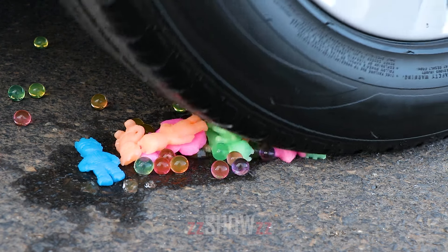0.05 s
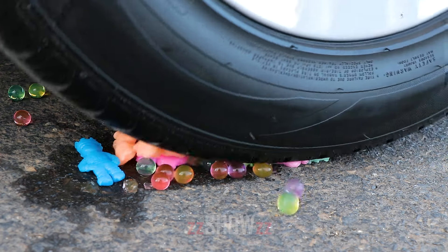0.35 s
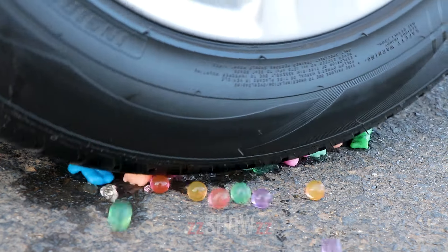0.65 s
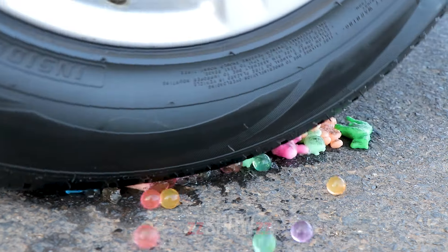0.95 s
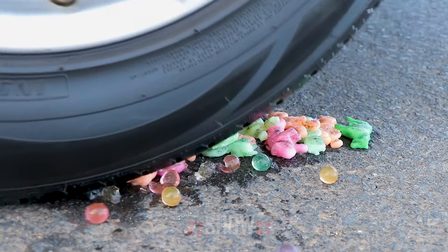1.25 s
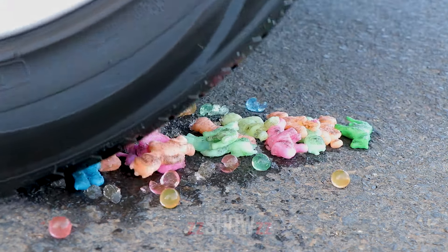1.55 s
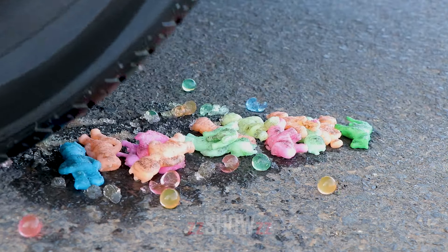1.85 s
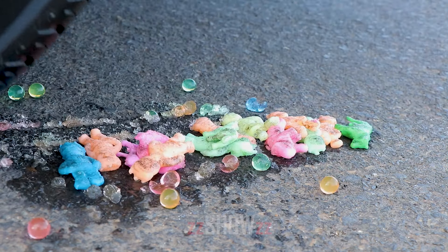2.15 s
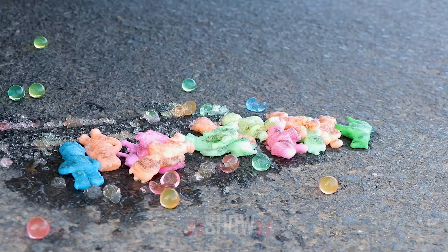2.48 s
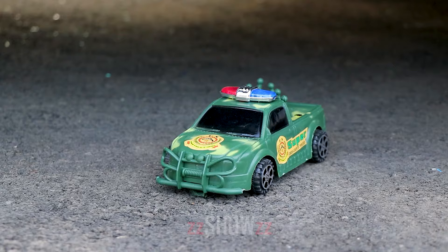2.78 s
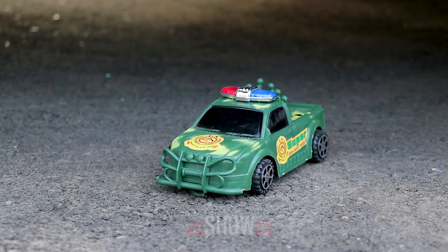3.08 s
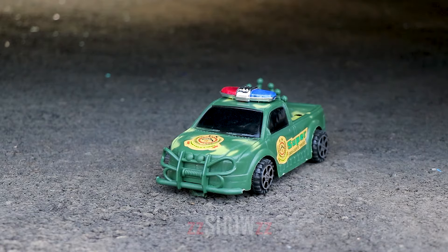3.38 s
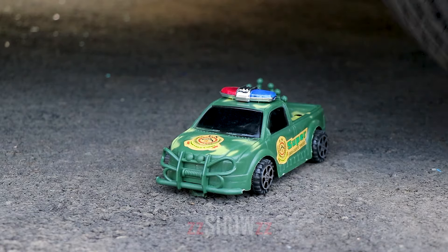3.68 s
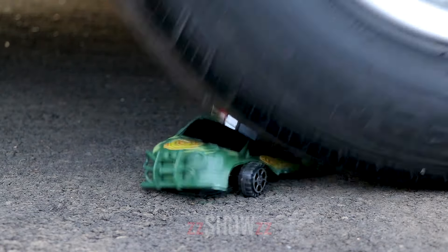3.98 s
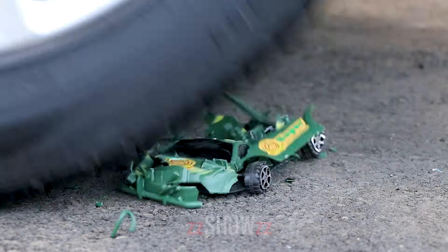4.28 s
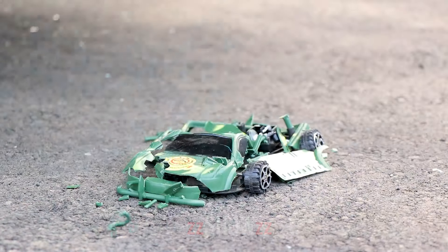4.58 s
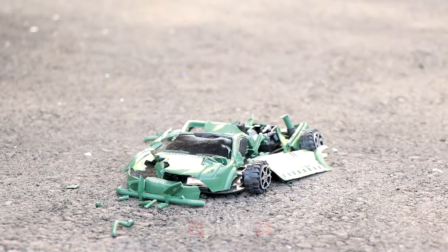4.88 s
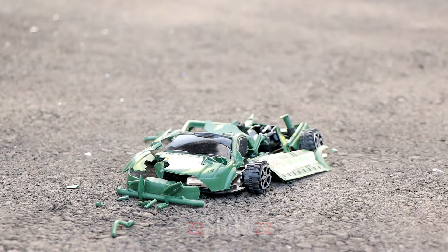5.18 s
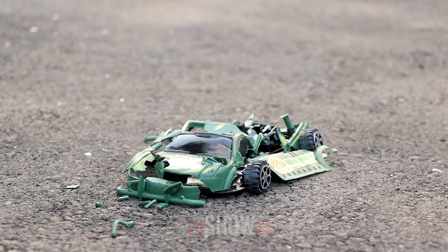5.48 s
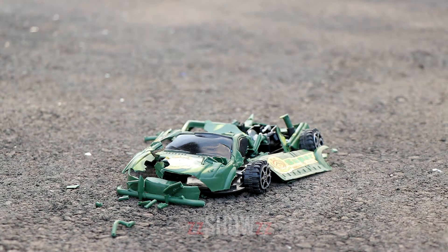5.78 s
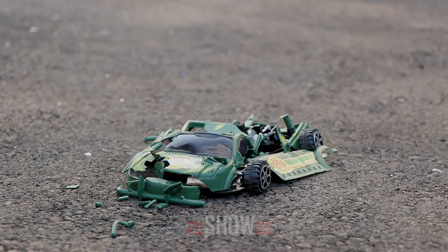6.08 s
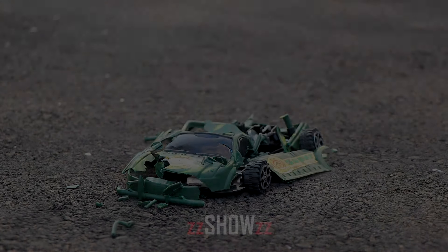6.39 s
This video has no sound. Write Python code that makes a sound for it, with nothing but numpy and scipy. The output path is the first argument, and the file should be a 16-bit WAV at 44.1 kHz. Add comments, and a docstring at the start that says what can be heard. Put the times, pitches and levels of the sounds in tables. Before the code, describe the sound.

Close to the asphalt outdoors, a car creeps along with its engine idling while the tyre squeezes wet gel beads, which squelch, squeak and pop. A faint cricket chirps and a few stones tick. The engine then revs and the tyre rolls over a hollow plastic toy truck with a short, very loud crunch. Splinters land, the engine settles, and a thin, high brake squeal sounds near the end.

```python
"""A car creeps over soft toys and water beads on asphalt, close by, its engine idling and its tread hissing.
First the wet beads squeak, plop and spray as they burst. Then a cricket chirps and a few stones tick.
Near 4 s the engine revs and the tyre rolls over a hollow plastic toy truck, whose shell gives way
in a run of cracks that overloads the microphone. The engine settles again, and near 6 s
a brake pad rubs its disc into a thin squeal as the car stops."""
import sys
import numpy as np
from scipy import signal
from scipy.fft import rfft, irfft
from scipy.io import wavfile

SR = 44100
rng = np.random.default_rng(int(sys.argv[2]) if len(sys.argv) > 2 else 0)


def store_pcm(level_fs):
    """Save levels as 16-bit WAV."""
    pcm = np.round(np.clip(level_fs, -1, 1) * 32767).astype(np.int16)
    wavfile.write(sys.argv[1], SR, np.atleast_2d(pcm).T)


N = 284004
TIME = np.arange(N) / SR

# the main cracks of the toy's shell: (time [s], length [s], snap level [dB], panel level before boost [dB])
CRACKS = [(4.026, 0.0039, -21, -12), (4.0314, 0.0043, -10.5, -4), (4.0408, 0.008, -5.5, 2),
          (4.052, 0.0068, -7, -1), (4.0634, 0.0068, -5.5, -12), (4.079, 0.0051, -3.5, -6),
          (4.0864, 0.0081, -5.5, -7.5), (4.1014, 0.0088, -6.5, -5.5), (4.1214, 0.0034, -3, -11.5),
          (4.1303, 0.009, -10.5, -15), (4.145, 0.0028, -8, -8), (4.155, 0.004, -10, -4),
          (4.165, 0.0021, -7.5, -13), (4.1727, 0.006, -8.5, -15), (4.186, 0.005, -9, -7),
          (4.1935, 0.0013, -2.5, -13), (4.2145, 0.0012, -6, -11), (4.218, 0.005, -3, -8.5),
          (4.226, 0.004, -14, -10.5), (4.2426, 0.0021, -1.5, 6.5), (4.261, 0.0014, -10, -5.5),
          (4.2884, 0.0013, -5, 0.5)]
# tone of a snap: (frequency [Hz], level [dB])
SNAP_TONE = [(100, -16.5), (200, -5), (300, -7.5), (600, 0), (1000, -1), (1350, -3), (2200, -3),
             (3200, -3.5), (5000, -7), (7000, -11), (11000, -19), (16000, -25)]
# notes the hollow shell rings at: (pitch [Hz], level [dB], time to fade by 60 dB [s])
SHELL_NOTES = [(266.4, -28.5, 0.12), (323, -29.5, 0.053), (429.4, -29, .09), (622, -29, .1),
               (760, -30.5, .1), (884, -27, 0.089), (1115, -35, 0.042), (1671, -29, .035),
               (2340, -31, 0.06), (2360, -27.5, 0.024), (2707, -29.5, 0.015), (4250, -28, 0.014),
               (5160, -31, 0.033)]
# pitch of the panel that gives way, mostly falling as the toy is flattened: (time [s], pitch [Hz])
PANEL_PITCH = [(4.04, 1060), (4.085, 915), (4.155, 494), (4.245, 456.4), (4.285, 644)]
# the louder beads bursting: (time [s], length [s], squeak level [dB], squeak pitch [Hz],
# plop level [dB], spray level before trim [dB])
BEAD_POPS = [(0.075, 0.0026, -43, 4350, -65, -66), (0.118, 0.016, -34.5, 2800, -51, -42.5),
             (0.14, 0.005, -34.5, 4900, -45, -37.5), (0.1577, 0.0015, -25.5, 4650, -51, -33),
             (0.258, 0.011, -39.5, 1800, -49, -48.5), (0.3568, 0.016, -29.5, 2370, -39.5, -41),
             (0.433, 0.019, -43.5, 1780, -44, -72), (0.4858, 0.008, -24.5, 3400, -59, -42),
             (0.499, 0.015, -35.5, 3380, -61, -54), (0.5346, 0.0057, -20, 2830, -53, -35.5),
             (0.5542, 0.0013, -27, 4400, -52, -26), (0.5615, 0.0018, -30, 4500, -47, -31),
             (0.5658, 0.0081, -24, 2930, -58, -37), (0.625, 0.0013, -31, 4460, -57, -47),
             (0.649, 0.00084, -30.5, 2340, -39, -39.5), (0.663, 0.007, -40.5, 3420, -46, -47),
             (0.753, 0.0036, -39, 2360, -56, -38), (0.856, 0.0013, -38, 2970, -59, -65),
             (0.912, 0.0091, -36.5, 3000, -44.5, -65), (0.929, 0.0055, -23, 2950, -44, -64),
             (0.973, 0.00092, -33.5, 3150, -57, -30), (1.01, 0.016, -40, 3600, -47, -48.5),
             (1.029, 0.019, -31, 2580, -35, -62), (1.18, 0.013, -39.5, 3550, -46, -64),
             (1.199, 0.0031, -25.5, 3870, -37, -32), (1.2758, 0.0072, -26.5, 2238, -31.5, -43.5),
             (1.3426, 0.0015, -28, 2440, -48, -62.5), (1.3638, 0.005, -25, 3320, -34.5, -37)]
# how loudly the wet gel is squeezed under the tread: (time [s], level [dB])
SQUELCH_LEVEL = [(0, -57), (.33, -50), (.62, -44.5), (.86, -52), (1.05, -49), (1.38, -52), (1.46, -71),
                 (2.1, -67), (3.1, -100)]
# strength of the gel's bubbles by pitch: (pitch [Hz], level [dB])
SQUELCH_TONE = [(1000, -3.5), (2200, -4.5), (3400, 6.5), (5000, 0), (7000, -6), (11000, -18), (16000, -34)]
# engine speed: (time [s], firing rate [Hz])
FIRING_RATE = [(0, 20), (1.05, 20.7), (1.65, 18.5), (3.54, 22.3), (3.77, 38), (3.95, 44), (4.25, 43),
               (4.85, 23.3), (5.85, 19.3)]
# the tones in the engine's hum: (multiple of the firing rate, level [dB])
HUM_TONES = [(1, -9), (2, -11), (3, -4.5), (4, -10.5), (5, -2.5), (6, -9.5), (7, -7), (8, -8), (9, -13.5),
             (10, -13.5), (12, -12)]
# tone of the engine's puffs: (frequency [Hz], level [dB])
ENGINE_TONE = [(30, -11), (60, -6), (110, -3), (200, -8), (310, 5.5), (430, 1.5), (720, 1), (1000, -0.5),
               (1500, -15), (2300, -16), (3200, -20.5), (5000, -22.5), (7000, -33.5), (11000, -42),
               (15000, -40)]
# notes the engine bay rings at: (pitch [Hz], level [dB], time to fade by 60 dB [s])
BAY_NOTES = [(314, -12, 0.041), (591, -15.5, 0.047), (751, -15, 0.091), (1060, -20, 0.11),
             (1780, -23, 0.096)]
# how loud the engine is; it drops suddenly at 2.7 s, swells on the run and fades out at the end:
# (time [s], level [dB])
ENGINE_LEVEL = [(0, 0), (1.7, 0.5), (2.66, -3.5), (2.74, -10.5), (3.4, -10), (3.9, -5), (5.1, -7),
                (6.44, -15.5)]
# hiss of grit under the creeping tread: (time [s], level [dB])
CREEP_HISS = [(0, -55.5), (1.38, -54.5), (1.5, -62), (2.65, -62), (3.45, -71), (6.44, -89)]
# tone of the tread's hiss: (frequency [Hz], level [dB])
HISS_TONE = [(400, -16), (1000, 3), (2200, 3), (3400, -4.5), (5000, -8.5), (7000, -15), (11000, -26),
             (16000, -28)]
# tone of the tyre's rumble: (frequency [Hz], level [dB])
RUMBLE_TONE = [(15, -35.5), (25, -14), (134, 1), (205, -3.5), (260, 2), (359, -9.5), (738, -0.5),
               (920, -11.5), (1270, -8.5), (3000, -23.5), (3900, -51), (6600, -120)]
# stones and splinters ticking on the asphalt: (time [s], level [dB], pitch [Hz])
TICKS = [(1.827, -53, 5000), (1.938, -52.5, 4500), (2.041, -47.5, 2490), (2.083, -47, 2330),
         (2.413, -59, 5000), (4.333, -37, 3620), (4.457, -39, 4680), (4.483, -55, 7400), (4.5, -53, 6000)]
# dull knocks and scuffs from the car: (time [s], length [s], level [dB], pitch [Hz])
KNOCKS = [(2.869, 0.022, -51, 486), (2.894, 0.03, -48.5, 247), (3.592, 0.026, -47, 1150),
          (5.505, 0.03, -52.5, 329.5), (6.311, 0.039, -64, 125.2)]
# the brake pad touches twice: (time of the peak [s], level [dB], swell time [s])
SQUEALS = [(5.985, -45.5, 0.077), (6.12, -73, 0.041)]
# cricket chirps: (time [s], peak level [dB])
CHIRPS = [(1.606, -62), (1.90, -61), (2.249, -56.5), (2.583, -58)]
# how long the yard echoes: (frequency [Hz], time to fade by 60 dB [s])
YARD_FADE = [(100, 0.6), (500, 0.52), (2000, 0.42), (5000, 1), (12000, .5)]
# tone of the yard's echo: (frequency [Hz], level [dB])
ECHO_TONE = [(100, 2), (220, 5.5), (400, 0.5), (650, 5.5), (1200, 2), (2500, -7), (5000, -12),
             (9000, -13.5), (16000, -21)]

CRUSH_START_S, CRUSH_END_S = 4.0, 4.29  # the tyre is on the toy truck


def toy_truck(shard_db=-12, shard_fade_s=.0036, panel_boost_db=2.5, panel_cycles=12, shell_db=-12):
    """Each crack is a run of tiny breaks: it rings the shell, pings a shard and lets a panel spring."""
    breaks, shards, panels = np.zeros((3, N))
    t = TIME[:SR // 10]
    for s, length, snap_db, panel_db in CRACKS + splinters():
        panel_hz = np.interp(s, *np.transpose(PANEL_PITCH)) * 2 ** (.08 * rng.uniform(-1, 1))
        run = clicks(length, per_s=9000, tail_s=.005, tail_db=-23)
        add(breaks, s, at_level(run, length, snap_db))
        shard_hz = 2000 * 3 ** rng.random()
        ping = ring(band(run, 890, 9000), shard_hz, shard_fade_s)
        add(shards, s, at_level(ping, length, snap_db + shard_db))
        # every panel rings for the same number of cycles, so the broad, low ones last longest
        swing = np.sin(2 * np.pi * panel_hz * t) * from_db(-60 * t * panel_hz / panel_cycles)
        add(panels, s, rng.choice([-1, 1]) * from_db(panel_db + panel_boost_db) * swing)
    shell = sum((-1) ** k * from_db(db) * ring(breaks, hz, fade_s)
                for k, (hz, db, fade_s) in enumerate(SHELL_NOTES))
    crunch = shape_tone(breaks, SNAP_TONE) + from_db(shell_db) * shell + shards + panels
    return band(crunch, 165, 20000)  # so small a body gives off little bass


def splinters(per_s=150, length_s=.002, snap_db=-20, panel_db=-18.5, range_db=16, spread_db=4):
    """Small cracks that grow louder with the weight on the toy; rows as in CRACKS."""
    after, size = scatter(CRUSH_END_S - CRUSH_START_S, per_s, columns=1)
    times = CRUSH_START_S + after
    levels = range_db * (weight(times) - 1) + spread_db * size
    return [(s, length_s, snap_db + db, panel_db + db) for s, db in zip(times, levels)]


def weight(s, roll_on_s=.05, roll_off_s=.12):
    """Share of the tyre's weight on the toy at time s: it comes on, stays and rolls off."""
    return np.clip(np.minimum((s - CRUSH_START_S) / roll_on_s, (CRUSH_END_S - s) / roll_off_s), 0, 1)


def beads(pitch_spread=1.174, skin_db=-12, spray_trim_db=-1.5):
    """Wet gel sticks and slips as it splits: a short squeak, a plop below it and a fine spray above."""
    out = np.zeros(N)
    spray_tone = [(2000, -31), (5000, 1), (8000, -3.5), (11000, -9.5), (16000, -16)]
    for s, length, squeak_db, hz, plop_db, spray_db in BEAD_POPS + small_pops():
        tear = clicks(length, per_s=4500, tail_s=.008, tail_db=-14)
        smooth = band(tear, 1900, 8800)  # soft gel rounds off every slip
        note = rms_one(band(smooth, hz / pitch_spread, hz * pitch_spread))
        squeak = note + from_db(skin_db) * rms_one(band(smooth, 2180, 3660))
        plop = band(band(tear, 810, 2700), 780, 2660)
        spray = shape_tone(clicks(length, per_s=3400, tail_s=.0068, tail_db=-10), spray_tone)
        for part, db in ((squeak, squeak_db), (plop, plop_db), (spray, spray_db + spray_trim_db)):
            add(out, s, at_level(part, length, db))
    return out


def small_pops(pile_s=1.2, per_s=28, length_s=.005, low_hz=1800, high_hz=5000, plop_db=-14, spray_db=-10):
    """Lesser beads burst at random, as strongly as the gel is squeezed; rows as in BEAD_POPS."""
    s, softness, pitch, stretch = scatter(pile_s, per_s, columns=3)
    db = np.interp(s, *np.transpose(SQUELCH_LEVEL)) + 3.5 - 1.5 * softness  # 2 to 5 dB over the squelch
    hz = low_hz * (high_hz / low_hz) ** ((pitch + 1) / 2)
    return list(zip(s, length_s * 2 ** stretch, db, hz, db + plop_db, db + spray_db))


def squelch(bubbles_per_s=1700, size_spread_db=1.5, clump_db=5.5, cycles=12, pitch_count=24):
    """Tiny wet bubbles snap in clumps, each ringing for a few cycles at one of many pitches."""
    sizes = from_db(size_spread_db * np.minimum(rng.exponential(1, N), 3)) * rng.choice([-1, 1], N)
    snaps = sizes * (rng.random(N) < bubbles_per_s / SR)
    snaps *= from_db(clump_db * np.tanh(drift(110)))
    pitch_choice = rng.integers(0, pitch_count, N)
    bubbles = sum(from_db(at_hz(SQUELCH_TONE, hz)) * ring(snaps * (pitch_choice == k), hz, cycles / hz)
                  for k, hz in enumerate(np.geomspace(1100, 15000, pitch_count)))
    return from_db(over_time(SQUELCH_LEVEL)) * rms_one(band(bubbles, 1100, 16000))


def engine(throb=.81, sharpness=5, rev_noise_db=5.5, rev_hum_db=23):
    """Every firing gives a puff of noise that rings the engine bay; low tones in step with it hum."""
    level_db, effort = over_time(ENGINE_LEVEL), revs()
    noise_db = -51.5 + level_db + rev_noise_db * effort
    hum_db = -63 + .55 * level_db + rev_hum_db * effort ** 2  # the hum follows ENGINE_LEVEL only partly
    firings = np.cumsum(over_time(FIRING_RATE)) / SR
    puffs = rms_one(1 + throb * np.exp(-sharpness * (firings % 1))) * rng.standard_normal(N)
    bay = sum(from_db(db) * rms_one(ring(puffs, hz, fade_s)) for hz, db, fade_s in BAY_NOTES)
    clatter = from_db(-3) * shape_tone(puffs, ENGINE_TONE) + bay
    hum = sum(from_db(db) * np.sqrt(2) * np.sin(2 * np.pi * (k * firings + rng.random()))
              for k, db in HUM_TONES)
    return from_db(noise_db) * clatter + from_db(hum_db) * hum


def revs(idle_hz=17, full_hz=46.6):
    """Engine speed, from near 0 at idle to near 1 at the height of the run."""
    return np.maximum(over_time(FIRING_RATE) - idle_hz, 0) / (full_hz - idle_hz)


def tyre(closest_s=4.11, pass_width_s=.15, pass_hiss_db=-43, grain_db=2,
         creep_rumble_db=-71, pass_rumble_db=-38.5, crush_rumble_db=-38):
    """The tread rumbles, and hisses unevenly on the grain of the asphalt."""
    # on the fast run, both grow with speed and fall with distance
    passing = revs() / np.hypot(1, (TIME - closest_s) / pass_width_s)
    hiss_gain = np.hypot(from_db(over_time(CREEP_HISS)), from_db(pass_hiss_db) * passing)
    run_gain = from_db(pass_rumble_db) * passing + from_db(crush_rumble_db) * weight(TIME)
    rumble_gain = np.hypot(from_db(creep_rumble_db), run_gain)
    grit = rng.standard_normal(N) * hiss_gain * from_db(grain_db * drift(460))
    return shape_tone(grit, HISS_TONE) + rumble_gain * shape_tone(rng.standard_normal(N), RUMBLE_TONE)


def ticks(length_s=.0029, ping_db=-3, ping_fade_s=.0089):
    """Stones snap out from under the tread and splinters land, each with a brief ping."""
    out = np.zeros(N)
    for s, db, hz in TICKS:
        bounces = clicks(length_s, per_s=3400, tail_s=.008, tail_db=-10)
        tick = rms_one(band(bounces, hz / 2, hz * np.sqrt(2)))
        ping = from_db(ping_db) * rms_one(ring(bounces, hz, ping_fade_s))
        add(out, s, at_level(tick + ping, length_s, db))
    return out


def knocks(pitch_spread=2.6):
    """Soft, dull rattles of the car's body and scuffs of the tyre."""
    out = np.zeros(N)
    for s, length, db, hz in KNOCKS:
        rattle = clicks(length, per_s=1900, tail_s=.022, tail_db=-7.5)
        low, high = hz / pitch_spread, hz * pitch_spread
        dull = band(band(rattle, low, high), low, high)
        add(out, s, at_level(dull, length, db))
    return out


def brake(disc_hz=12463, waver_hz=8, fade_s=.043):
    """The pad sets one high note of the disc singing; each touch swells and fades."""
    pitch = disc_hz + waver_hz * drift(30)
    level = sum(from_db(db) * np.exp(-((TIME - s) / np.where(TIME < s, swell_s, fade_s)) ** 2)
                for s, db, swell_s in SQUEALS)
    return level * np.sqrt(2) * np.sin(2 * np.pi * np.cumsum(pitch) / SR)


def cricket(start_hz=5100, end_hz=4600, stroke_s=.028, spacing_s=.04, chorus_hz=4830, chorus_db=-89):
    """Three wing strokes a chirp, each falling in pitch, over the faint trill of far-off insects."""
    out = from_db(chorus_db + 3 * drift(14)) * rms_one(ring(rng.standard_normal(N), chorus_hz, .042))
    along = np.linspace(0, 1, round(stroke_s * SR))
    pitch = start_hz + (end_hz - start_hz) * along
    stroke = np.sin(np.pi * along) ** 2 * np.sin(2 * np.pi * np.cumsum(pitch) / SR)
    for s, db in CHIRPS:
        for k in range(3):
            add(out, s + k * spacing_s, from_db(db) * stroke)
    return out


def with_echoes(x, near_db=-16, near_s=.015, yard_db=-28):
    """Sound bounces quickly off the wheel and underbody, then rings faintly and dully round the yard."""
    t = TIME[:SR]
    near = band(rng.standard_normal(SR), 200, 8800) * np.exp(-t / near_s) * (t > .002)
    edges, yard = np.geomspace(60, 16000, 9), 0
    for low, high in zip(edges, edges[1:]):
        fade_s = at_hz(YARD_FADE, np.sqrt(low * high))
        yard += band(rng.standard_normal(SR), low, high) * from_db(-60 * t / fade_s)
    yard = shape_tone(yard * (t > .012), ECHO_TONE)
    echoes = (from_db(near_db) * rms_one(near) + from_db(yard_db) * rms_one(yard)) / np.sqrt(SR)
    return x + signal.fftconvolve(x, echoes)[:N]


def clicks(length, per_s, tail_s, tail_db):
    """A burst of uneven clicks for length seconds, then a weaker trail that dies away."""
    t = TIME[:SR // 10]
    fires = rng.random(len(t)) < per_s / SR
    fires[0] = True
    sizes = rng.choice([-1, 1], len(t)) * rng.uniform(.11, 1, len(t))
    return fires * sizes * np.where(t < length, 1, from_db(tail_db) * np.exp(-(t - length) / tail_s))


def scatter(length_s, per_s, columns):
    """Uneven moments from 0 to length_s, with columns of random numbers between -1 and 1."""
    draws = rng.random((256, columns + 1))
    s = (np.arange(len(draws)) + draws[:, 0]) / per_s
    return s[s < length_s], *(2 * draws[s < length_s, 1:].T - 1)


def drift(per_s):
    """A random wander of about 1 either way, heading for a new value per_s times a second."""
    targets = rng.standard_normal(4096)
    return np.interp(TIME * per_s, np.arange(len(targets)), targets)


def ring(x, hz, fade_s):
    """Each click in x starts a pure note that fades by 60 dB in fade_s."""
    decay, angle = from_db(-60 / (fade_s * SR)), 2 * np.pi * hz / SR
    return signal.lfilter([0, np.sin(angle)], [1, -2 * decay * np.cos(angle), decay * decay], x + 1e-18)


def band(x, low_hz, high_hz):
    """Gently turn down everything outside two frequencies."""
    sections = signal.butter(2, [low_hz, min(high_hz, SR / 2 - 1000)], "band", fs=SR, output="sos")
    return signal.sosfilt(sections, x + 1e-18)


def shape_tone(x, tone, size=2048):
    """Filter by rows of (frequency [Hz], level [dB]); white noise keeps its power."""
    gain = rms_one(from_db(at_hz(tone, np.arange(size + 1) * SR / (2 * size))))
    # fold the filter so that nothing sounds ahead of a click (minimum phase)
    cepstrum = irfft(np.log(gain))
    cepstrum[1:size] *= 2
    cepstrum[size + 1:] = 0
    return signal.fftconvolve(x, irfft(np.exp(rfft(cepstrum))))[:len(x)]


def at_hz(rows, hz):
    """Read a table at a frequency, with octaves evenly spaced."""
    frequencies, values = np.transpose(rows)
    return np.interp(np.log(hz + 1), np.log(frequencies), values)


def over_time(rows):
    """Join rows of (time [s], value) with straight lines, one value a sample."""
    return np.interp(TIME, *np.transpose(rows))


def at_level(sound, length, db):
    """Give a burst the energy of the level db held for length seconds."""
    return sound * from_db(db) * np.sqrt(length * SR / (np.sum(sound ** 2) + 1e-20))


def rms_one(x):
    """Scale to an average strength (rms) of 1."""
    return x / np.sqrt(np.mean(x ** 2) + 1e-20)


def from_db(db):
    """Turn decibels into a number to multiply by."""
    return 10 ** (np.asarray(db) / 20)


def add(out, s, sound):
    """Mix a short sound in at time s."""
    start = max(round(s * SR), 0)
    out[start:start + len(sound)] += sound[:N - start]


def scene():
    """The small sounds near the tyre echo; tread, engine, cricket and brake lie behind them."""
    close = beads() + squelch() + toy_truck() + ticks() + knocks()
    return (with_echoes(close) + tyre() + engine() + cricket() + brake())[None]


def record(dry, ceiling=.73, hardness=5, low_cut_hz=30, high_cut_hz=16000):
    """The loudest cracks overload the microphone and flatten; the deepest bass and top treble are cut."""
    clipped = dry / (1 + np.abs(dry / ceiling) ** hardness) ** (1 / hardness)
    thinned = signal.sosfilt(signal.butter(1, low_cut_hz, "high", fs=SR, output="sos"), clipped)
    return signal.fftconvolve(thinned, signal.firwin(201, high_cut_hz, fs=SR)[None], "same")


dry = scene()
out = record(dry)
store_pcm(out)
```